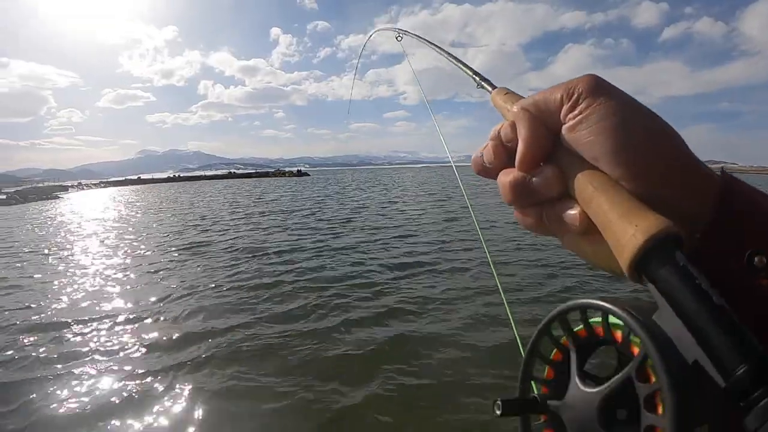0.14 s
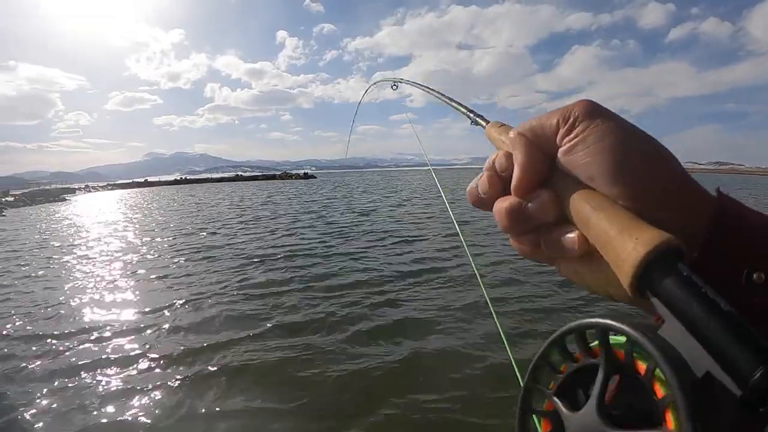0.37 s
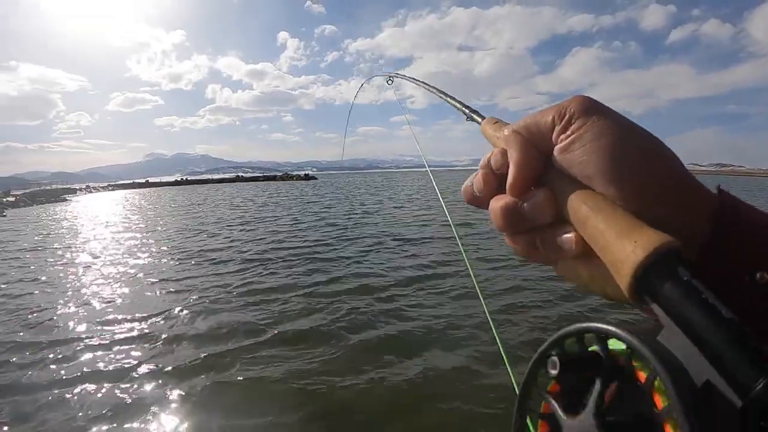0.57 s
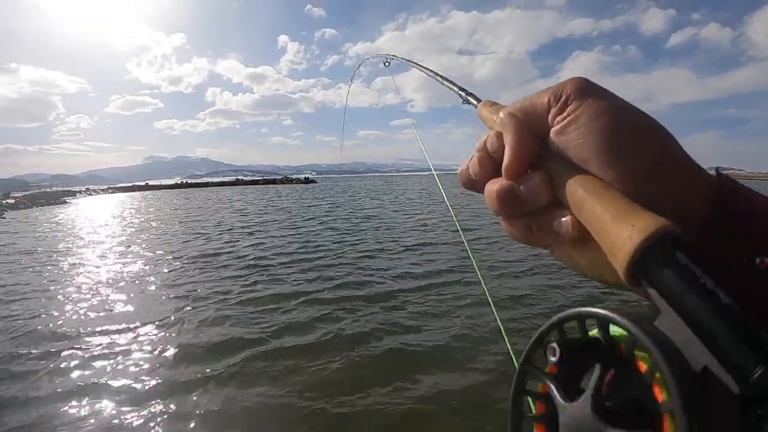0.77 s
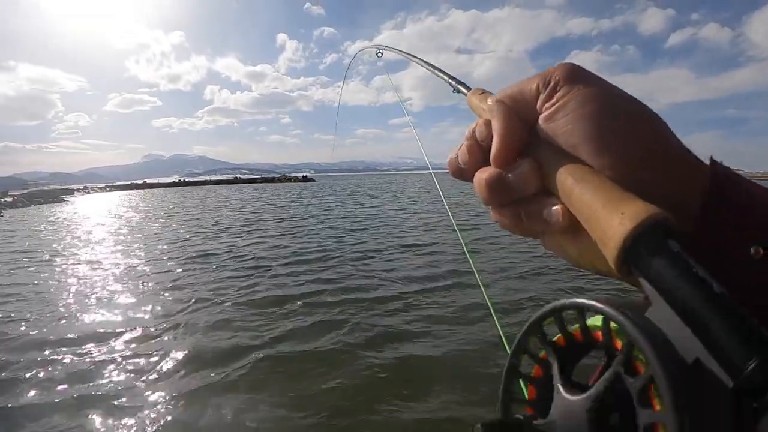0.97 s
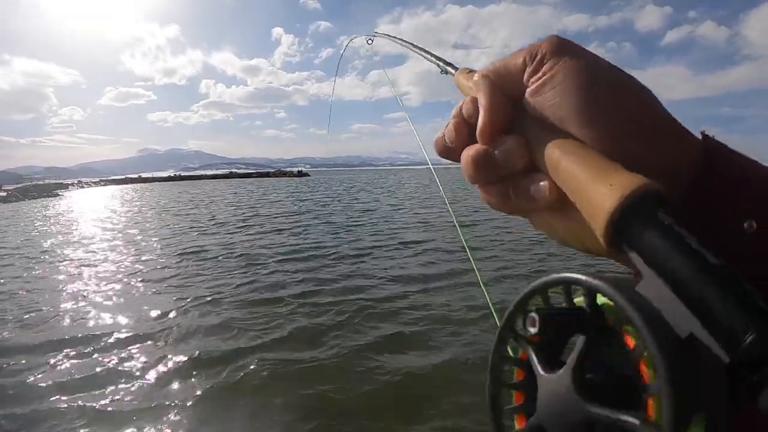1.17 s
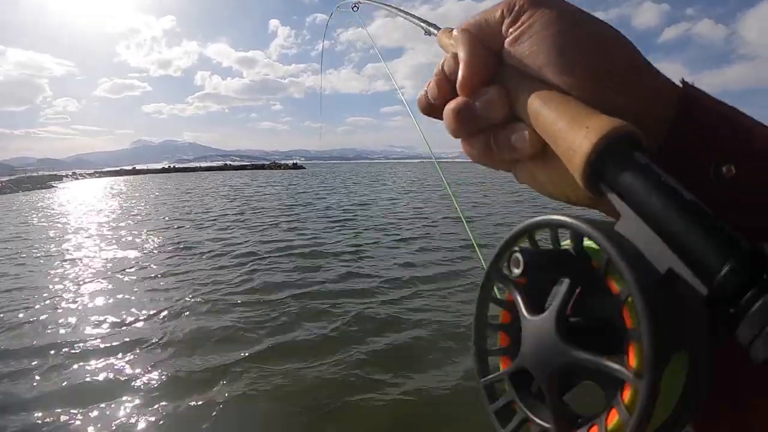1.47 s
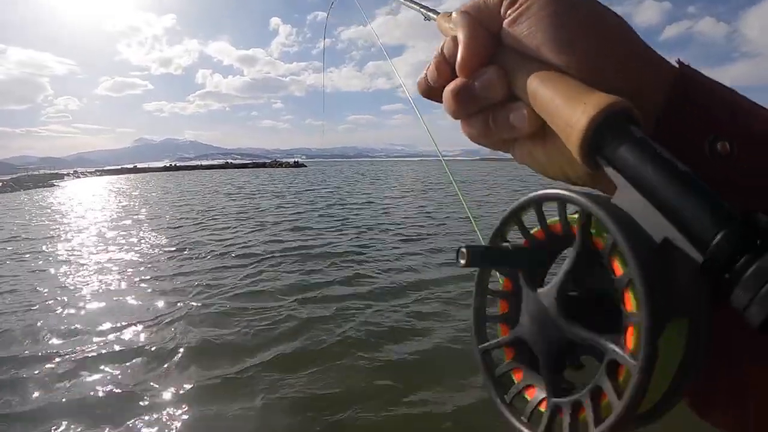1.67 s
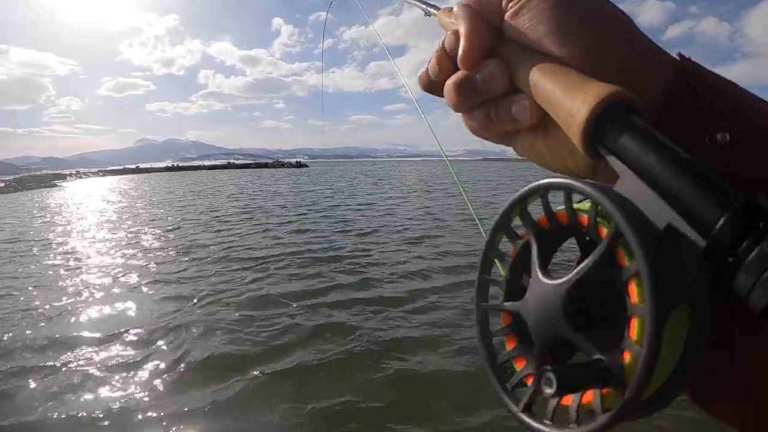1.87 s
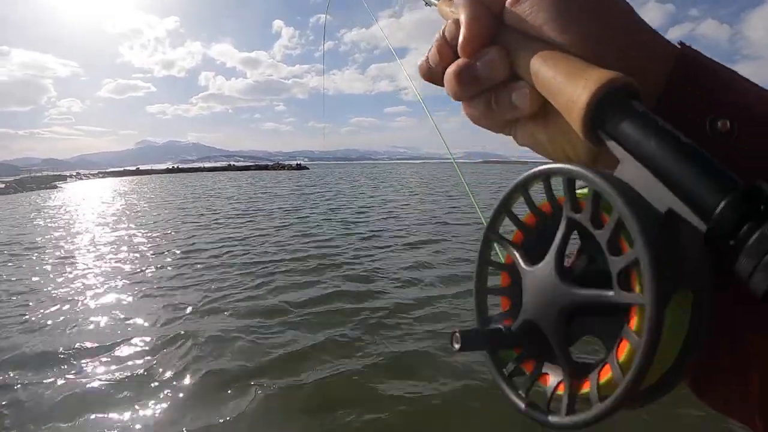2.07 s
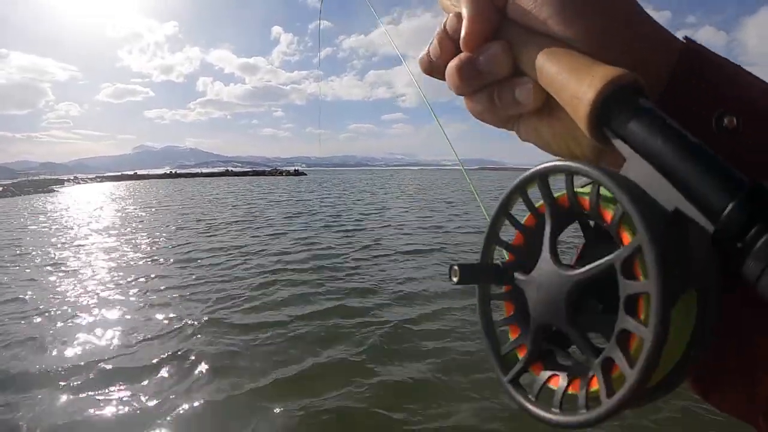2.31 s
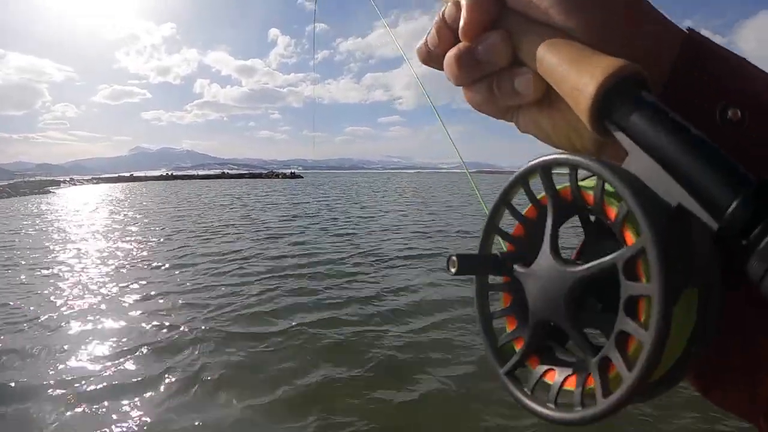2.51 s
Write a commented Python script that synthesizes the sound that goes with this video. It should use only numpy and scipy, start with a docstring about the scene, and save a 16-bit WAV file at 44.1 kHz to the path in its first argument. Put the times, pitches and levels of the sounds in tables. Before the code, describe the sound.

A fly fishing reel clicks, buzzes as line is pulled off, then ticks to a stop.

```python
"""Fly reel running by a lake

A fish pulls line off a close-up fly reel. The pawl ticks over the spool's ratchet: a few hesitant
clicks, a surging run that blurs into a buzz, then a coast to a stop. Each click rings the metal, whose
colour shifts as the spool turns. Underneath, wind rumbles, line rubs and three small waves lap."""
import sys
import numpy as np
from scipy import signal
from scipy.fft import rfft, irfft, next_fast_len
from scipy.io import wavfile
from scipy.ndimage import map_coordinates

SR = 44100
rng = np.random.default_rng(int(sys.argv[2]) if len(sys.argv) > 2 else 0)


def log_audio(samples):
    """Write samples as a 16-bit WAV file to the path given in sys.argv[1]."""
    # one column per channel
    frames = np.atleast_2d(samples).T
    # limit to full scale, then quantise
    limited = np.clip(frames, -1, 1)
    pcm = np.round(limited * 32767).astype(np.int16)
    wavfile.write(sys.argv[1], SR, pcm)


N = 116865

# stereo image of the noises: f/Hz, left-right correlation
STEREO_LIKENESS = [(8000, 1), (10500, 1), (12500, 0.64), (15000, .3)]
# colour of the wind: f/Hz, level/dB
WIND_COLOUR = [(20, -27), (45, -16), (80, -3), (170, -0.5), (320, -8), (640, -20.5), (1000, -29.5),
               (2000, -34), (6000, -60), (15000, -95)]
# gusts: t/s, level/dB
WIND_GUSTS = [(0, -38), (.33, -33.5), (.55, -37.5), (1.08, -32), (1.22, -36), (1.44, -32.5), (1.65, -35),
              (2.05, -35.5), (2.4, -32), (2.64, -37)]
# single ticks before and after the run: t/s, level/dB, extra spool ring/dB
SLOW_CLICKS = [(0.0986, -13.5, -0.5), (0.1508, -13, 1.5), (0.1986, -12.5, 0), (0.2259, -14, 2),
               (0.2455, -16, 1), (0.2627, -17, 1), (0.2788, -15, 6), (0.2952, -18.5, 14),
               (0.3172, -12.5, 10), (0.3684, -10, 4), (0.3905, -10, -1), (2.0263, -9.5, 2),
               (2.0426, -10, 4), (2.0597, -6.5, -2), (2.0776, -9.5, 2), (2.0956, -9.5, 1),
               (2.1147, -8.5, 1), (2.134, -8.5, 1.5), (2.1535, -8.5, -1.5), (2.173, -10.5, 0.4),
               (2.192, -14, 4), (2.2132, -11, 0.4), (2.2382, -12, 0), (2.2683, -9, -3.5), (2.3097, -11, 0),
               (2.376, -11, -0.3)]
# spool speed during the run: t/s, rate/(teeth per s)
RUN_SPEED = [(0.391, 74.5), (0.41, 110), (0.458, 221.4), (0.482, 236.5), (0.542, 173.0), (0.562, 172.4),
             (0.598, 239.5), (0.638, 385.9), (0.662, 416.0), (0.686, 423.2), (0.75, 308.8), (0.766, 294.1),
             (0.798, 320.5), (0.834, 410.0), (0.858, 424.6), (0.898, 381.1), (0.93, 299.3), (0.954, 257.0),
             (0.982, 254.5), (1.034, 332.3), (1.054, 332.9), (1.082, 315.3), (1.122, 228.3), (1.142, 200.0),
             (1.174, 197.4), (1.222, 263.8), (1.258, 288.9), (1.322, 227.2), (1.37, 217.0), (1.418, 262.5),
             (1.474, 275.3), (1.498, 272.6), (1.546, 237.7), (1.59, 201.2), (1.646, 187.4), (1.682, 157.5),
             (1.75, 114.5), (1.78, 106.5), (1.817, 100), (1.86, 89), (1.895, 80), (1.985, 71.5),
             (2.01, 64.5)]
# weight of the clicks during the run: t/s, level/dB
RUN_FORCE = [(.4, -12.5), (.5, -9), (.57, -11.5), (.66, -10.5), (.9, -10.5), (1.15, -10), (1.5, -9),
             (1.68, -8.5), (1.76, -11.5), (1.86, -7.5), (2.0, -8)]
# the spool's main ring, swelling twice a turn: f/Hz, level/dB, swing/dB, loudest tooth
SPOOL_RING = (3721, -1.5, 4, 5.5)
# modes of pawl and frame, swinging once a turn:
# f/Hz, level/dB, t60/s, swing/dB, tooth where the swing adds in full, gain when lifted/dB
FRAME_RINGS = [(1600, -31, .008, -6, 5, -13), (2475, -23.5, 0.0085, -3, 12, -3),
               (3230, -7, 0.0099, 2, 14, 0.5), (3520, -3.5, .009, 4, 3, -0.5),
               (4264, -13, 0.018, 2.5, 13.5, -5), (4690, -12.5, 0.012, 2, 10, -5.5),
               (5200, -17, .007, 2.5, 10, -12.5), (6130, -32, 0.02, 6, 24, 6.5),
               (7250, -16.5, 0.0071, 6, 7.5, -8), (7780, -21, 0.013, 6, 7.5, -6),
               (10650, -27.5, 0.011, 1, 30, 3.5), (13300, -41, .005, 0, 30, 5)]
# the reel is raised closer, rebalancing the frame modes: t/s, share of the lift
REEL_LIFT = [(1.0, 0), (1.8, 1)]
# colour of a click's noisy snap: f/Hz, level/dB
SNAP_COLOUR = [(1000, -19), (2400, -14), (3450, -7), (5100, -12), (6300, -11.5), (9000, -40)]
# colour of a click's bright edge: f/Hz, level/dB
EDGE_COLOUR = [(5500, -25), (7500, 0), (8700, -15), (10700, -8), (11900, -27), (15500, -33)]
# envelope of the line rub: t/s, level/dB
RUB_ENVELOPE = [(0, -61), (.17, -47.5), (.24, -36.5), (.3, -37), (.35, -45.5), (.41, -38), (2.0, -40),
                (2.22, -40), (2.36, -54.5), (2.64, -66.5)]
# colour of the line rub: f/Hz, level/dB
RUB_COLOUR = [(400, -29), (1200, -12), (2300, -2.5), (3800, -1.5), (5200, -6.5), (6500, -13.5), (7900, -14),
              (9500, -24), (15500, -50)]
# small waves: centre t/s, length/s, level/dB, f/Hz
WAVE_LAPS = [(1.04, 0.14, -44.5, 430), (1.34, 0.045, -44, 675), (1.864, 0.12, -41.5, 550)]

TEETH = 36
ATTACK_S, SPOOL_T60_S, SNAP_T60_S = .0003, .019, .009
JITTER_S, CLICK_SCATTER_DB, MODE_SCATTER_DB = .000011, .8, 1.0
REBOUND_S, REBOUND_SPREAD_S, REBOUND_DB = .0014, .00004, -13
EDGE_DB, EDGE_SWING_DB, EDGE_TOOTH, EDGE_FLICKER_DB = -23.5, 3, 7, 2.2
REEL_DB, SNAP_DB = -.8, -18
NOTCH_HZ, NOTCH_WIDTH_HZ, NOTCH_DB, TOP_HZ = 8980, 150, -26, 15860
CLICK_TIME = np.arange(SR // 20) / SR


def amp(db):
    return 10 ** (np.asarray(db) / 20)


def unit_rms(x):
    return x / np.sqrt(np.mean(x ** 2) + 1e-20)


def at_frequency(rows, hz):
    """Read (f/Hz, value) rows on a log axis."""
    f, values = np.transpose(rows)
    return np.interp(np.log(hz + 1), np.log(f + 1), values)


def curve(rows, times=None):
    """Read (t/s, value) rows at the given times, or at every sample."""
    return np.interp(np.arange(N) / SR if times is None else times, *np.transpose(rows))


def wobble(rate):
    """Smooth random modulation, rate knots a second."""
    knots = rng.standard_normal(int(N * rate / SR) + 4)
    return map_coordinates(knots, [np.arange(N) * rate / SR])


def filtered(x, response):
    """EQ x with a gain given as a function of frequency."""
    size = next_fast_len(N + SR // 2)
    return irfft(rfft(x, size) * response(np.fft.rfftfreq(size, 1 / SR)), size)[..., :N]


def noise(colour):
    """Coloured stereo noise of rms 1, mono but for the top treble."""
    def mid_side_gains(hz):
        width = np.arccos(np.clip(at_frequency(STEREO_LIKENESS, hz), -1, 1)) / 2
        return amp(at_frequency(colour, hz)) * [np.cos(width), np.sin(width)]
    mid, side = filtered(rng.standard_normal((2, N)), mid_side_gains)
    return unit_rms(np.array([mid + side, mid - side]))


def pulses(times, db, order=8):
    """Impulses placed between samples by a windowed sinc."""
    at = times[:, None] * SR
    taps = np.floor(at).astype(int) + np.arange(1 - order, order + 1)
    shape = np.sinc(taps - at) * np.cos(np.pi * (taps - at) / (2 * order)) ** 2
    return np.bincount(np.clip(taps, 0, N).ravel(), (amp(db)[:, None] * shape).ravel(), N + 1)[:N]


def wind():
    """A low, fluttering bed of wind over the lake."""
    flutter_db = 1.6 * wobble(25.08)
    return amp(curve(WIND_GUSTS) + .14 + flutter_db) * noise(WIND_COLOUR)


def pawl_drops():
    """The pawl drops once per tooth: t/s, level/dB, extra ring/dB, tooth number (0 ends the run)."""
    t = np.linspace(RUN_SPEED[0][0], RUN_SPEED[-1][0], N)
    teeth_passed = np.cumsum(curve(RUN_SPEED, t)) * (t[1] - t[0])
    teeth_passed -= teeth_passed[-1]
    run_times = np.interp(np.arange(np.ceil(teeth_passed[0] + .5), 1), teeth_passed, t)
    fast = np.column_stack([run_times, curve(RUN_FORCE, run_times), np.zeros(len(run_times))])
    slow = np.array(SLOW_CLICKS) + [0, .3, 0]  # a touch louder
    clicks = np.vstack([slow, fast])
    times, db, ring_db = clicks[np.argsort(clicks[:, 0])].T
    return times, db, ring_db, np.arange(len(times)) - np.sum(times < run_times[-1])


def scatter(tooth):
    """One random offset per click."""
    return rng.standard_normal(1024)[tooth]


def rotation(tooth, peak_tooth, per_turn=1):
    """A swing between -1 and 1 that follows the spool round."""
    return np.cos(2 * np.pi * per_turn * (tooth - peak_tooth) / TEETH)


def click_envelope(t60):
    """A fast attack and an exponential tail."""
    return amp(-60 * CLICK_TIME / t60) * (1 - np.exp(-CLICK_TIME / ATTACK_S))


def metal_ring(times, db, ring_db, tooth):
    """Spool, pawl and frame ring at every drop and again, softly, as the pawl rebounds."""
    rebounds = times + REBOUND_S + REBOUND_SPREAD_S * scatter(tooth)

    def mode(hz, t60, strike_db):
        tone = np.sin(2 * np.pi * hz * CLICK_TIME) * click_envelope(t60)
        blows = pulses(times, strike_db) + pulses(rebounds, strike_db + REBOUND_DB)
        return signal.fftconvolve(blows, tone)[:N]

    spool_hz, level, swing, peak_tooth = SPOOL_RING
    spool_db = level + ring_db + swing * rotation(tooth, peak_tooth, per_turn=2)
    metal = mode(spool_hz, SPOOL_T60_S, db + spool_db)
    for k, (hz, level, t60, swing, peak_tooth, lift_db) in enumerate(FRAME_RINGS):
        mode_db = level + swing * rotation(tooth, peak_tooth) + lift_db * curve(REEL_LIFT, times)
        mode_db += MODE_SCATTER_DB * scatter(tooth)
        polarity = (-1) ** (k + int(hz > spool_hz))  # neighbouring modes start in opposite directions
        metal += polarity * mode(hz, t60, db + mode_db)
    return metal


def bright_edge(times, db, tooth):
    """A flickering treble sizzle on the clicks that flares once a turn."""
    edge_db = db + EDGE_DB + EDGE_SWING_DB * rotation(tooth, EDGE_TOOTH)
    envelope = signal.fftconvolve(pulses(times, edge_db), click_envelope(SNAP_T60_S))[:N]
    return envelope * amp(EDGE_FLICKER_DB * wobble(30))  * noise(EDGE_COLOUR)


def pawl_snap(times, db):
    """Every drop of the pawl fires the same short crack of noise."""
    crack = noise(SNAP_COLOUR)[:, :len(CLICK_TIME)] * click_envelope(SNAP_T60_S)
    return signal.fftconvolve(pulses(times, db + SNAP_DB)[None], crack)[:, :N]


def reel():
    """Slightly uneven ratchet clicks, each layered from ring, edge and snap."""
    times, db, ring_db, tooth = pawl_drops()
    times = times + JITTER_S * scatter(tooth)
    db = db + CLICK_SCATTER_DB * scatter(tooth)
    return metal_ring(times, db, ring_db, tooth) + bright_edge(times, db, tooth) + pawl_snap(times, db)


def line_rub():
    """A grainy hiss of line rubbing as it leaves the spool."""
    grain_db = 2.76 * wobble(160)
    return amp(curve(RUB_ENVELOPE) + grain_db) * noise(RUB_COLOUR)


def lapping_water(width_octaves=.31):
    """Each small wave is a soft swell of hollow, narrow-band noise."""
    t, laps = np.arange(N) / SR, np.zeros(N)
    for centre, length, db, pitch in WAVE_LAPS:
        band = lambda hz: np.exp(-(np.log2((hz + 1) / pitch) / width_octaves) ** 2 / 2)
        slosh = unit_rms(filtered(rng.standard_normal(N), band))
        swell = np.exp(-2 * ((t - centre) / length) ** 2)
        laps += amp(db) * swell * slosh
    return laps


def scene():
    """The reel up front, over line, wind and water."""
    return amp(REEL_DB) * reel() + line_rub() + wind() + lapping_water()


def record(dry):
    """The microphone has one narrow dip in the treble and keeps nothing above its band limit."""
    notch = lambda hz: amp(NOTCH_DB * np.exp(-((hz - NOTCH_HZ) / NOTCH_WIDTH_HZ) ** 2))
    return filtered(dry, lambda hz: notch(hz) * (hz < TOP_HZ))


dry = scene()
out = record(dry)
log_audio(out)
```